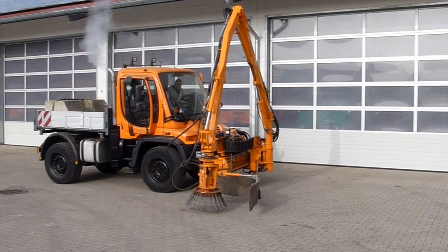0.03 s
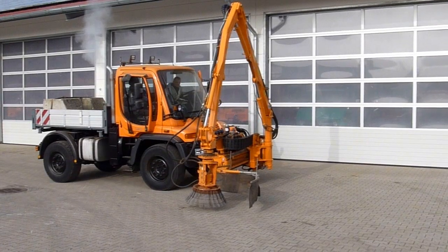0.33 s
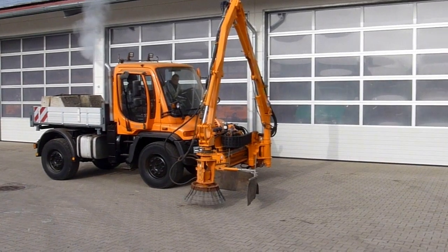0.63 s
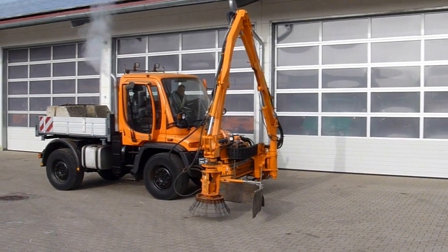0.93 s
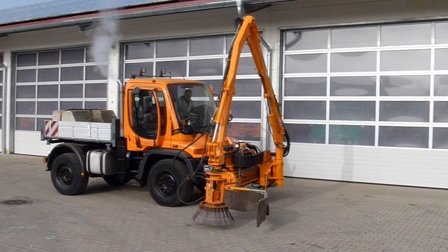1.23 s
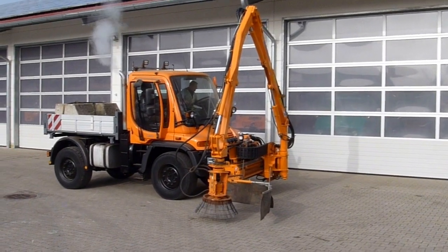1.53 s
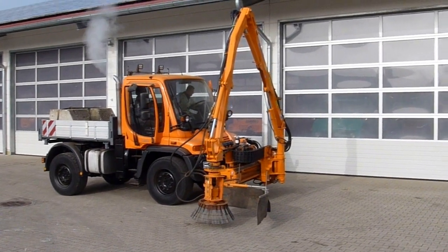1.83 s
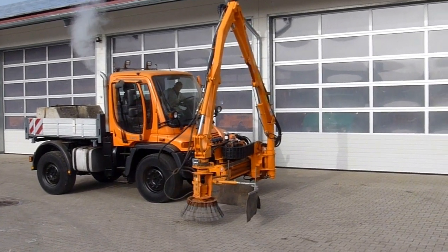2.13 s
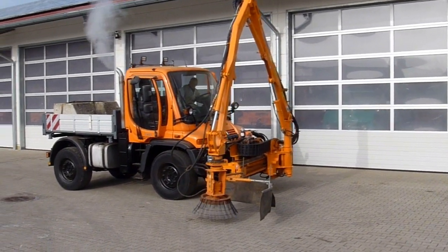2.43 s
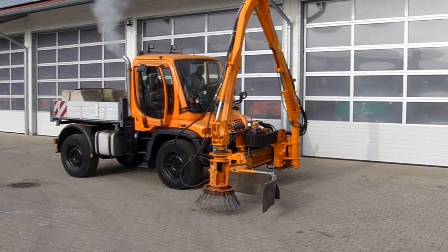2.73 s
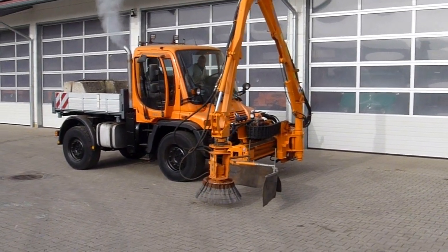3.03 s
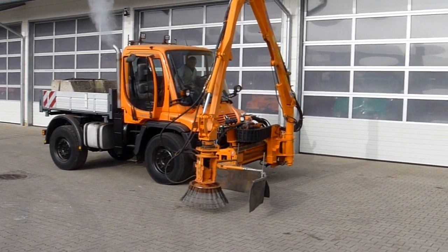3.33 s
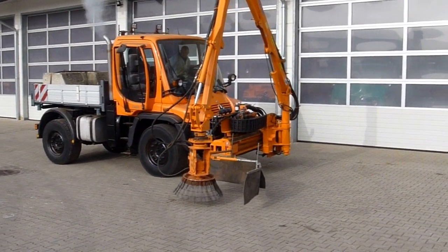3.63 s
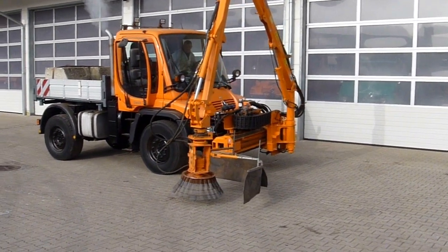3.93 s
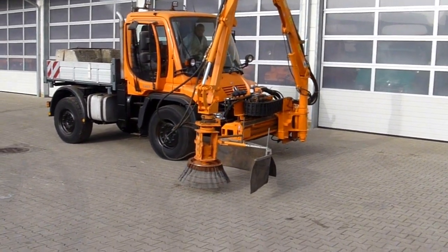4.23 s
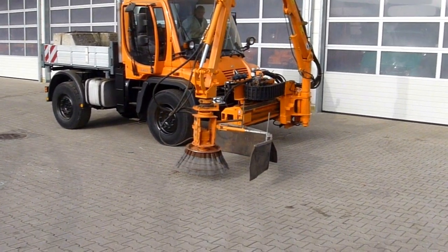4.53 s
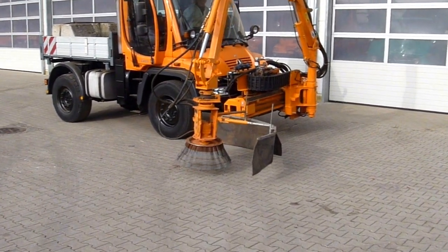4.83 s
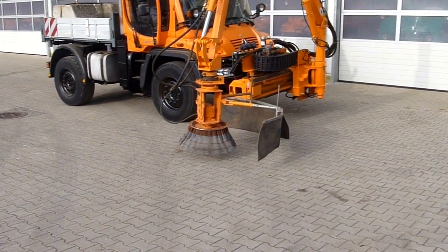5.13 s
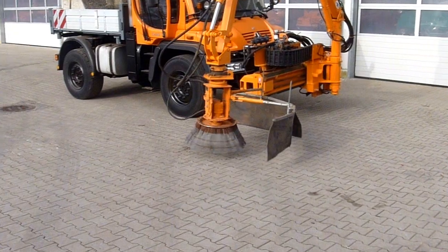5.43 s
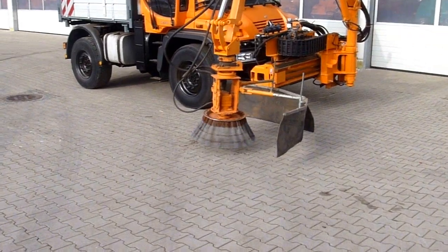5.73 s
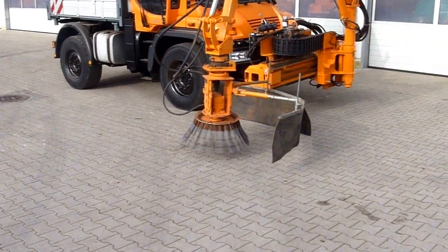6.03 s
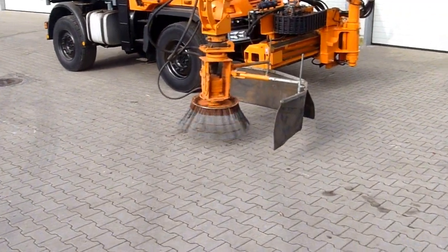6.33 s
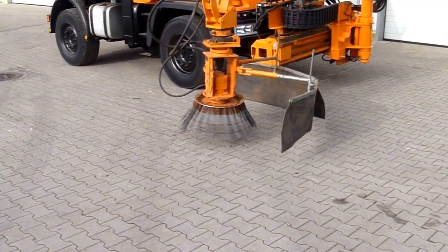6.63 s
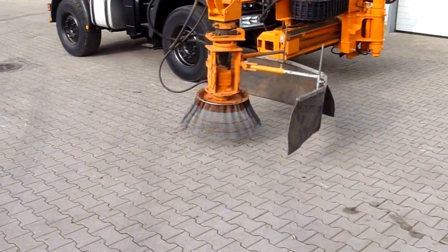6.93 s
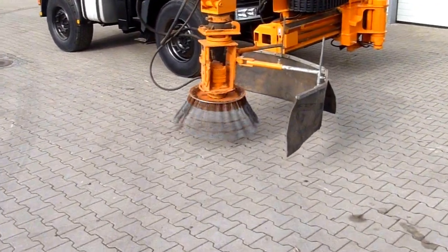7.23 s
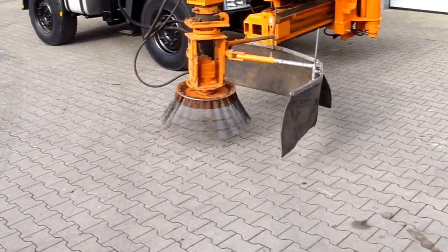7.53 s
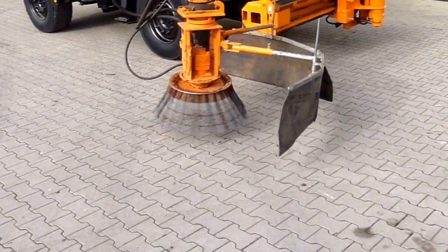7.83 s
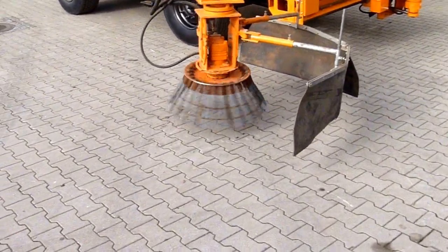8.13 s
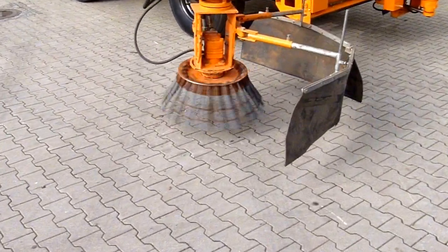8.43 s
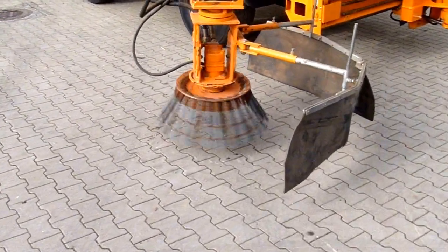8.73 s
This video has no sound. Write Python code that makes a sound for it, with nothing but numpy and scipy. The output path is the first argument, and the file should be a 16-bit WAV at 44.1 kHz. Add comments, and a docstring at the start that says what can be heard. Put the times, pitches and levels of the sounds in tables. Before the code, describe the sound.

After half a second of silence, the loud roar of a diesel truck cuts in, holding a fast idle on a paved yard. The exhaust drones and throbs against the hum of a hydraulic drive, and the engine block clatters evenly. A spinning wire brush scours the stones with a dense, scratchy hiss. The wires snag with short rasps at about 2.8 and 3.3 seconds, hardest at 3.5 with a low thud, and faintly again at 3.9. From about 3.5 to 7.5 seconds the microphone is carried towards the brush, with faint air rumbling over it. The scouring grows clearly louder, joined by the metallic ring of the brush head and a thin singing of steel wires. The engine keeps its speed underneath, its boom swelling and fading, and the close brushing continues to the end at nearly 9 seconds.

```python
"""On a paved yard, a six-cylinder diesel truck holds a fast idle and drives a wire weed brush.
The exhaust drones and beats against the hum of the hydraulic drive, and the engine block clatters.
The wires scour the stones with thousands of tiny ticks a second, and now and then catch on a joint.
The microphone is carried towards the brush, so the scouring and the ring of the brush head grow."""
import sys
import numpy as np
from scipy import signal
from scipy.fft import rfft, irfft
from scipy.io import wavfile

SR = 44100
rng = np.random.default_rng(int(sys.argv[2]) if len(sys.argv) > 2 else 0)


def to_wav(sig):
    """Store sig (one row per channel, or 1-D mono) as 16-bit WAV at the path in sys.argv[1].

    Samples outside -1..1 are clipped; the rate is SR.
    """
    pcm = np.clip(np.atleast_2d(sig), -1, 1) * 32767
    pcm = np.round(pcm).astype(np.int16)
    wavfile.write(sys.argv[1], SR, pcm.T)  # frames by channels


N = 388080
T = np.arange(N) / SR
CYCLE_HZ = 12.055  # one engine cycle is two turns of the crank and six firings
WALK_FROM_S, WALK_TO_S = 3.35, 7.6  # the microphone moves up to the brush

# Tone colour of air on the microphone: (frequency [Hz], relative level [dB])
AIR_SPECTRUM = [(12, 3.0), (30, -2), (60, -5.0), (120, -26.5)]
# Hum of the hydraulic drive: (pitch [Hz], level [dB])
DRIVE_TONES = [(66.2, -55.5), (125, -41.5), (139, -42), (196.5, -38), (393, -52), (562, -53), (673, -49.5)]
# Tones of the exhaust: (pitch [multiples of the cycle rate], level [dB])
ENGINE_TONES = [(2, -68.5), (4, -54.5), (9, -45), (10, -39.5), (12, -41.5), (18, -42.5), (20, -45),
                (21, -44), (22, -49), (23, -53), (24, -53), (26, -55), (28, -45), (30, -43.5), (31, -46),
                (32, -48.5), (34, -46.5), (36, -62)]
# Low drones, each with one loud or dead spot on the walk; the one at 16 throbs against the drive:
# (pitch [multiples of the cycle rate], level [dB], change at the spot [dB], time [s], spread [s])
EXHAUST_DRONES = [(6, -43.5, 5.5, 4.15, 0.45), (8, -43.5, -13, 5.2, 1.3), (14, -39.5, 9.5, 5.15, .3),
                  (16, -39, 6, 2.3, .5)]
# The exhaust's strongest boom swells and fades: (time [s], relative level [dB])
BOOM_LEVELS = [(0.56, -40), (0.97, -34), (1.06, -42.5), (2.3, -24.5), (2.55, -45), (3.17, -30), (4.69, -46),
               (4.74, -30), (5.4, -42.5), (5.7, -27), (6.73, -33.5), (7.56, -31), (7.65, -41), (8.8, -35)]
# Tone colour of the exhaust's rumble: (frequency [Hz], relative level [dB])
RUMBLE_SPECTRUM = [(20, -22), (55, -19), (90, -14.5), (120, -5.5), (180, 5), (250, 3), (320, -13.5),
                   (450, -14), (900, -22.5)]
# Tone colour of the engine block's clatter: (frequency [Hz], relative level [dB])
CLATTER_SPECTRUM = [(150, -11.5), (300, 5.5), (380, -10), (470, -8), (600, 1.5), (900, 1), (1250, -1),
                    (1550, -6), (2000, -7.5), (2350, -7), (3100, -10), (3700, -25.5), (4700, -25),
                    (7500, -44.5)]
# Body panels rung by the engine, each facing one part of the walk:
# (pitch [Hz], half-width [Hz], level [dB], loudest at [s], spread [s])
PANEL_RINGS = [(300, 18, -33, 0.56, 0.29), (867, 35, -41, 5, 1.4), (944, 73, -40.5, 1.2, 0.62),
               (800, 110, -46, 2.8, 2.4), (2320, 220, -48.5, 2.2, 2.4), (3470, 270, -55.5, 1.7, 1.4),
               (4730, 1200, -58.5, 0.93, 2.2)]
# Tone colour of wires scouring stone: (frequency [Hz], relative level [dB])
SCOUR_SPECTRUM = [(250, -14.5), (420, 3.5), (650, 0), (830, -3), (1100, -2), (1600, -2), (1850, -2),
                  (2750, -7), (3050, -11.5), (3400, -18), (4200, -20), (4900, -26), (6300, -25.5),
                  (7800, -38)]
# Ring of the brush head and its guard:
# (pitch [Hz], half-width [Hz], level [dB], loudest at [s], spread [s])
HEAD_RINGS = [(382.6, 17, -42, 6.9, 1.8), (555, 63, -36, 7.6, 3.9), (536, 79, -34.5, 8.62, 0.11),
              (671, 11, -38, 5.4, 1.1), (1037, 68, -40.5, 9, 0.71), (1166, 93, -39, 7.1, 1.9),
              (1435, 60, -40, 7.8, 1), (1770, 120, -47.5, 5.4, 1.3), (2420, 450, -49.5, 7.5, 0.45)]
# Thin singing of the steel wires, heard close up:
# (pitch [Hz], half-width [Hz], relative level [dB], loudest at [s], spread [s])
WIRE_RINGS = [(4178, 13, -59.5, 7.4, 1.9), (4325, 13, -57.5, 7.2, 1.4)]
# Wires catch on joints in the paving:
# (time [s], level [dB], rise [s], decay [s], ring pitch [Hz], half-width [Hz], share of rasp [0-1])
WIRE_CATCHES = [(2.83, -30, 0.075, 0.056, 2530, 600, 0.52), (2.844, -44, 0.061, 0.05, 4480, 1400, 0.23),
                (3.325, -31, .01, 0.04, 2980, 900, 0.82), (3.515, -25.5, 0.0056, 0.024, 1650, 380, 0.43),
                (3.52, -22.5, 0.017, 0.051, 1060, 450, 0.43), (3.9, -34, .02, 0.034, 2380, 300, 0.26)]
# Tone colour of a tuft rasping free: (frequency [Hz], relative level [dB])
RASP_SPECTRUM = [(300, -13), (700, 2), (1750, 4.5), (2800, -16.5), (3800, -11), (5500, -16), (7800, -28)]
# Low bumps and booms: (time [s], level [dB], pitch [Hz], decay [s])
LOW_BUMPS = [(3.52, -40, 35, .04), (3.595, -30, 97.3, .05), (3.6, -26.5, 190, 0.027), (6.24, -40, 28, .025),
             (8.06, -45, 27.6, .04)]


def amp(db):
    """Turns decibels into a number to multiply a sound by."""
    return 10 ** (np.asarray(db) / 20)


def unit(x):
    """Scales a signal to an average strength (rms) of 1."""
    return x / np.sqrt(np.mean(x ** 2) + 1e-20)


def colour(x, spectrum):
    """Gives x the tone colour in a table, fading away beyond the table's ends."""
    hz, db = np.transpose(spectrum)
    f = np.fft.rfftfreq(N, 1 / SR) + 1
    edges = 1 / np.sqrt((1 + (hz[0] / 2 / f) ** 4) * (1 + (f / 2 / hz[-1]) ** 4))
    shape = amp(np.interp(np.log(f), np.log(hz), db))
    return unit(irfft(rfft(x) * edges * shape, N))


def ring(x, hz, width):
    """Makes x ring near one pitch; a smaller width rings longer."""
    f = np.fft.rfftfreq(N, 1 / SR)
    return unit(irfft(rfft(x) / (1 + 1j * (f - hz) / width) ** 2, N))


def drift(rate):
    """A smooth random wobble, up to about rate changes a second."""
    f = np.fft.rfftfreq(N, 1 / SR)
    return unit(irfft(rfft(rng.standard_normal(N)) * np.exp(-(f / rate) ** 2) * (f > 0), N))


def tone(turns, waver):
    """A tone that wavers as echoes from the yard mix with it."""
    echo = waver * (drift(1.7) + 1j * drift(2))
    return unit(((1 + echo) * np.exp(2j * np.pi * (turns + rng.random()))).real)


def swell(s, spread):
    """A smooth hump in loudness around time s."""
    return np.exp(-((T - s) / spread) ** 2)


def burst(s, rise, decay):
    """A sharp peak in loudness that builds up to time s and dies away."""
    return np.exp(-np.maximum((s - T) / rise, (T - s) / decay))


def ringing_parts(x, table):
    """Parts shaken by x ring, each loudest where the microphone faces it."""
    return sum(amp(db) * swell(s, spread) * ring(x, hz, width) for hz, width, db, s, spread in table)


def approach(near_db, ease_per_s=0.13):
    """The level changes by near_db on the walk up to the brush, then eases back past it."""
    nearness = np.clip((T - WALK_FROM_S) / (WALK_TO_S - WALK_FROM_S), 0, 1)
    return amp(near_db * (nearness - ease_per_s * np.maximum(T - WALK_TO_S, 0)))


def breeze(db=-54, gust_db=3):
    """Air moves over the microphone as it is carried forward."""
    air = colour(rng.standard_normal(N), AIR_SPECTRUM)
    return amp(db + gust_db * drift(4)) * swell(s=6.4, spread=2.5) * air


def ground_dip(x, hz=305, width=38, depth=0.49):
    """Close to the truck, the echo off the paving partly cancels a band of low sound."""
    f = np.fft.rfftfreq(N, 1 / SR)
    band = irfft(rfft(x) * np.exp(-((f - hz) / width) ** 2), N)
    return x - depth * swell(s=7, spread=1.7) * band


def hydraulics(cycles):
    """The drive is geared to the engine, and its hum beats against the exhaust's tones."""
    return sum(amp(db) * tone(hz * cycles / CYCLE_HZ, waver=0.2) for hz, db in DRIVE_TONES)


def exhaust(cycles, puff_depth=0.26, throb_hz=3.7, throb_db=1):
    """Tones that follow the engine, over a surging rumble that is puffed out at each firing."""
    tones = sum(amp(db) * tone(k * cycles, waver=0.28) for k, db in ENGINE_TONES)
    drones = sum(amp(db + spot_db * swell(s, spread)) * tone(k * cycles, waver=0.17)
                 for k, db, spot_db, s, spread in EXHAUST_DRONES)
    boom_db = np.interp(T, *np.transpose(BOOM_LEVELS)) - 1
    boom = amp(boom_db) * tone(11 * cycles, waver=0.077)
    firing = np.cos(2 * np.pi * 6 * cycles)
    puffs = rng.standard_normal(N) * (1 + puff_depth * firing)
    surge_db = throb_db * np.sin(2 * np.pi * (throb_hz * T + rng.random()))
    rumble = amp(-33.5 + surge_db) * approach(near_db=1) * colour(puffs, RUMBLE_SPECTRUM)
    return tones + drones + boom + rumble


def clatter(cycles, crank_knock=0.41, firing_knock=0.21, repeat_share=0.28):
    """The block knocks at every firing and harder once per crank turn, ringing the body panels."""
    one_cycle = rng.standard_normal(round(SR / CYCLE_HZ))  # this part of the rattle repeats
    repeating = np.interp(cycles % 1, np.linspace(0, 1, len(one_cycle)), one_cycle)
    fresh = rng.standard_normal(N)
    rattle = np.sqrt(repeat_share) * unit(repeating) + np.sqrt(1 - repeat_share) * fresh
    crank, firing = (2 * cycles) % 1, (6 * cycles) % 1
    decay = 0.29  # as a share of the gap between knocks
    blows = rattle * (1 + crank_knock * np.exp(-crank / decay) + firing_knock * np.exp(-firing / decay))
    block = amp(-28.5) * approach(near_db=-0.7) * colour(blows, CLATTER_SPECTRUM)
    return block + ringing_parts(blows, PANEL_RINGS)


def wire_ticks(per_s, spread_db):
    """Wire tips snap across the stone: many small ticks and a few large ones."""
    size = amp(spread_db * np.minimum(rng.exponential(1, N), 4))
    return unit(size * rng.choice([-1, 1], N) * (rng.random(N) < per_s / SR))


def bumps(rise_s=0.017):
    """Short, low thuds sound underneath the brushing."""
    return sum(amp(db) * burst(s, rise_s, decay) * np.sqrt(2) * np.sin(2 * np.pi * (hz * T + rng.random()))
               for s, db, hz, decay in LOW_BUMPS)


def catches():
    """A tuft of wires snags, then rasps and rings as it pulls free."""
    ticks = wire_ticks(per_s=2400, spread_db=1.0)
    rasp = colour(ticks, RASP_SPECTRUM)
    out = np.zeros(N)
    for s, db, rise, decay, hz, width, share in WIRE_CATCHES:
        snag = unit(share * rasp + (1 - share) * ring(ticks, hz, width))
        out += amp(db) * burst(s, rise, decay) * snag
    return out


def brush(tuft_db=1.0, sway_db=0.47):
    """Tufts press unevenly on the paving; their ticks ring the brush head and the wires."""
    ticks = wire_ticks(per_s=6000, spread_db=2.5) * amp(tuft_db * drift(45) + sway_db * drift(3.4))
    scour = amp(-32.5) * approach(near_db=6) * colour(ticks, SCOUR_SPECTRUM)
    singing = amp(-2) * ringing_parts(ticks, WIRE_RINGS)
    return scour + ringing_parts(ticks, HEAD_RINGS) + singing


def scene():
    """The engine holds a nearly steady speed while the brush works the paving."""
    cycles = np.cumsum(CYCLE_HZ * (1 + 0.001202 * drift(1.474))) / SR  # engine cycles so far
    truck = exhaust(cycles) + hydraulics(cycles) + clatter(cycles) + brush()
    return (ground_dip(truck) + catches() + bumps() + breeze())[None]


def record(dry, start_s=0.5355, offset=0.016, cutoff_hz=8130):
    """The sound cuts in suddenly, riding on a small constant offset; the highest treble is cut."""
    live = (dry + offset) * (T >= start_s)
    low_pass = signal.firwin(301, cutoff_hz, window=("kaiser", 9), fs=SR)
    return signal.oaconvolve(live, low_pass[None], "same")


dry = scene()
out = record(dry)
to_wav(out)
```